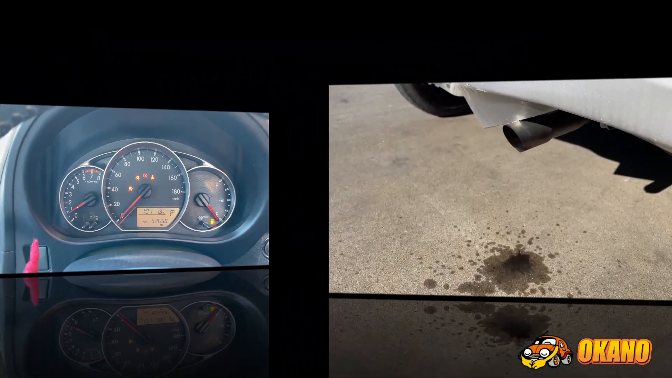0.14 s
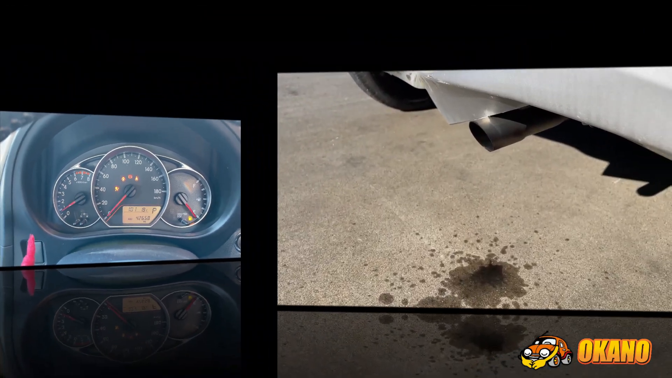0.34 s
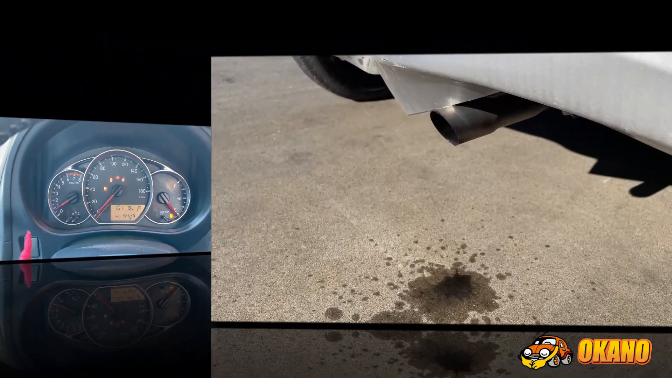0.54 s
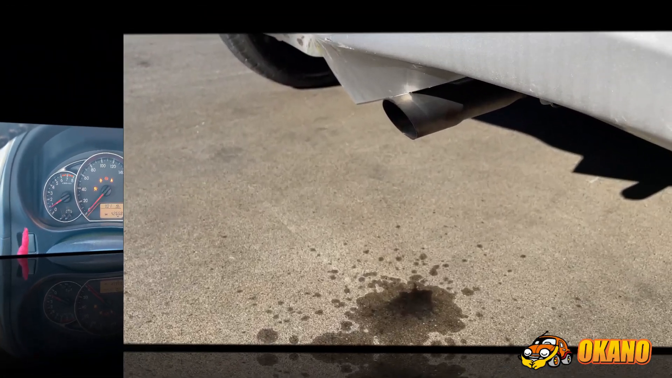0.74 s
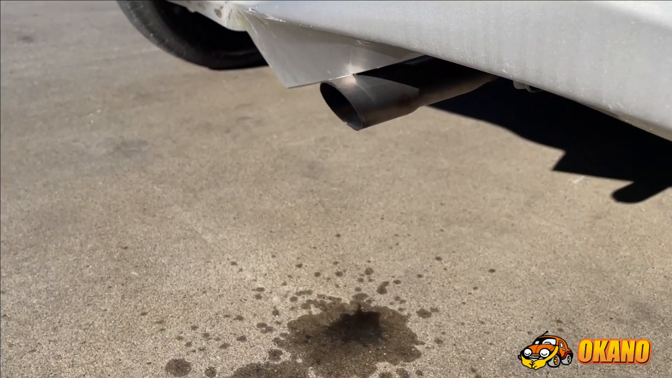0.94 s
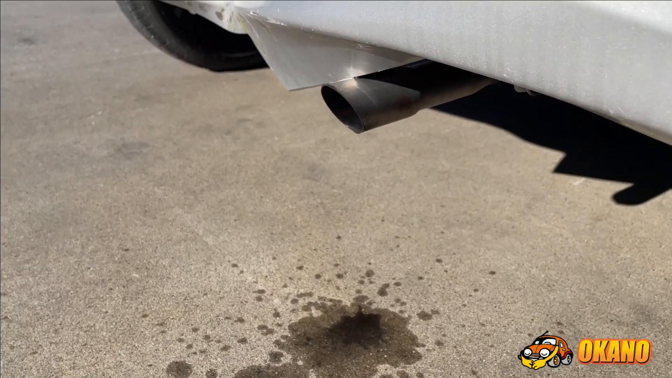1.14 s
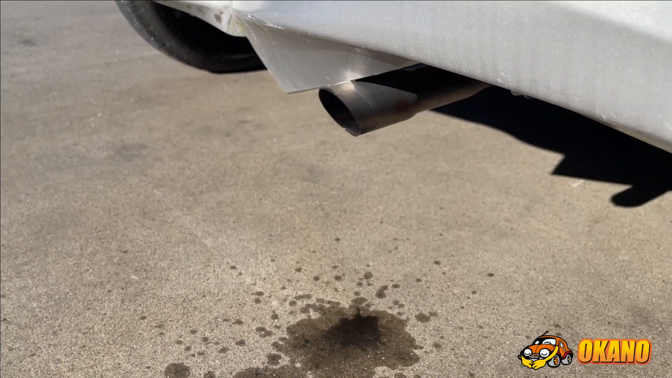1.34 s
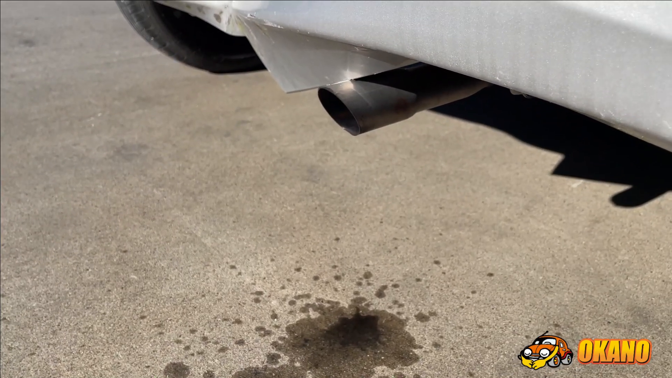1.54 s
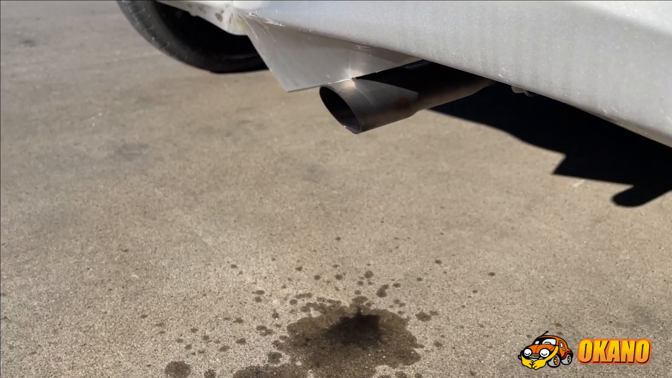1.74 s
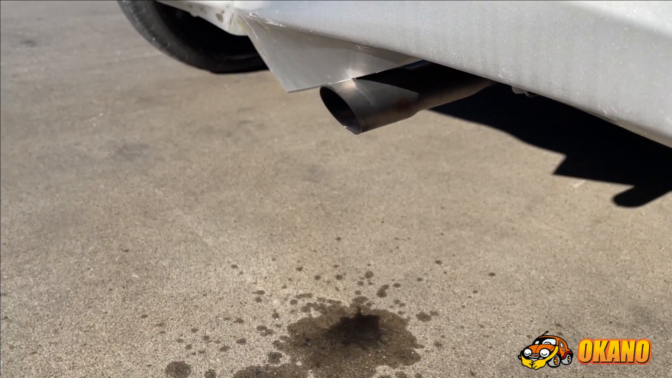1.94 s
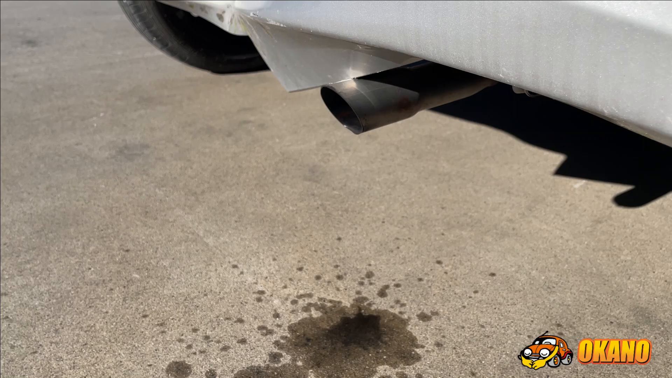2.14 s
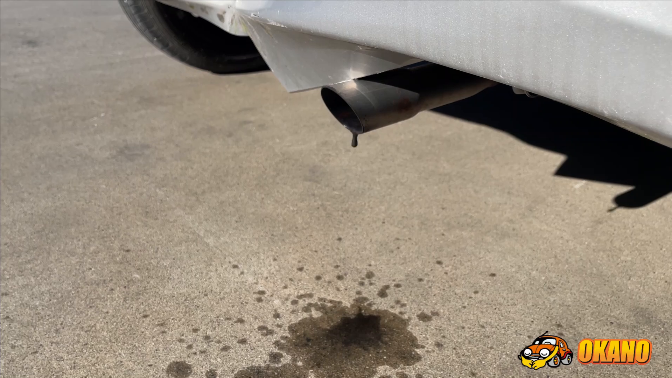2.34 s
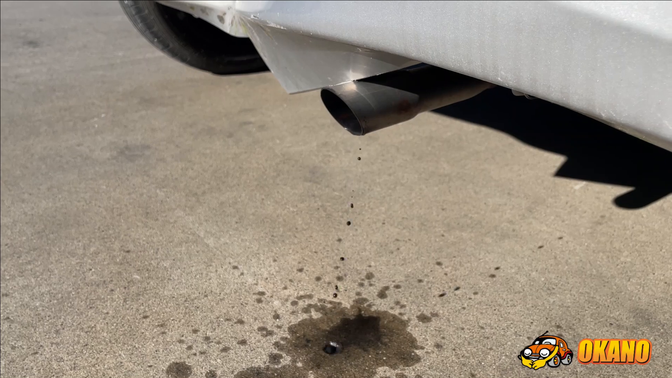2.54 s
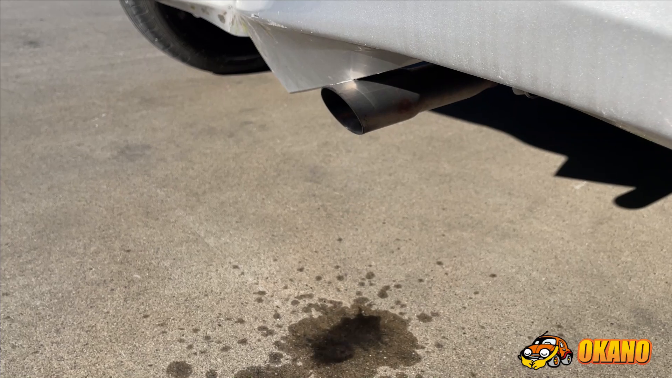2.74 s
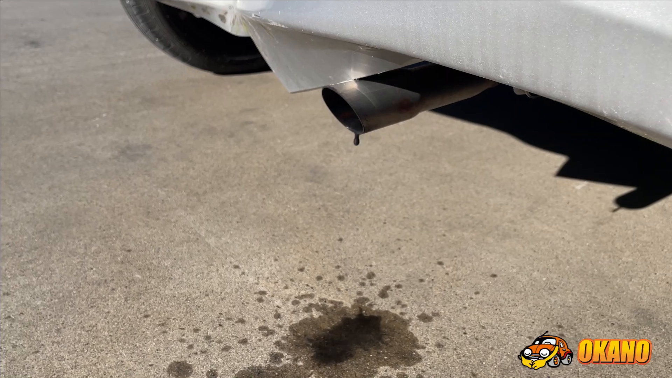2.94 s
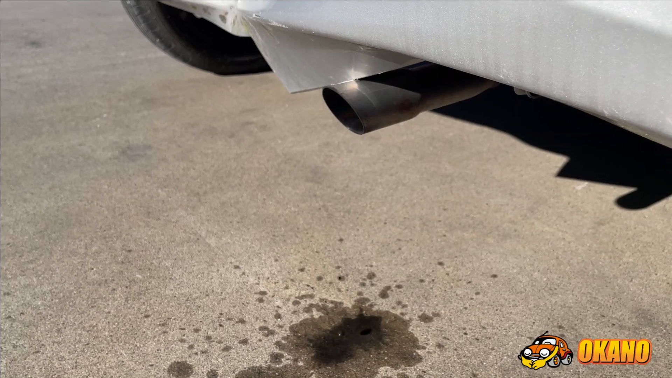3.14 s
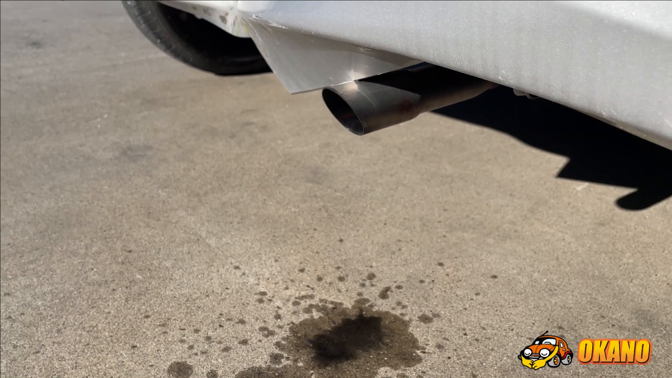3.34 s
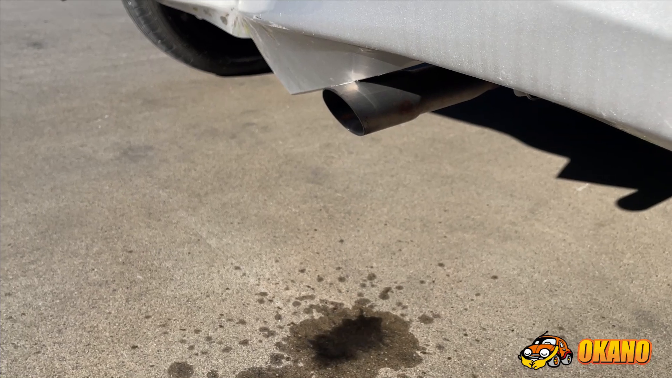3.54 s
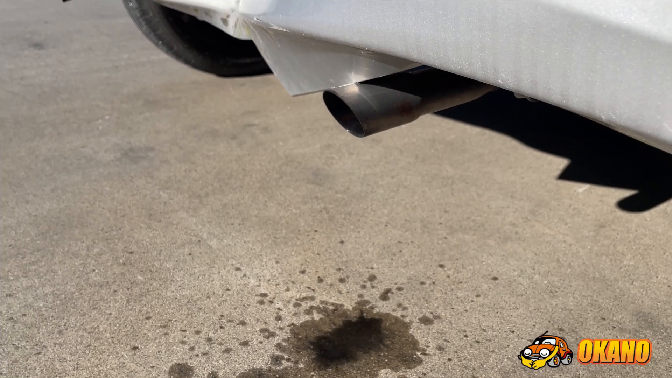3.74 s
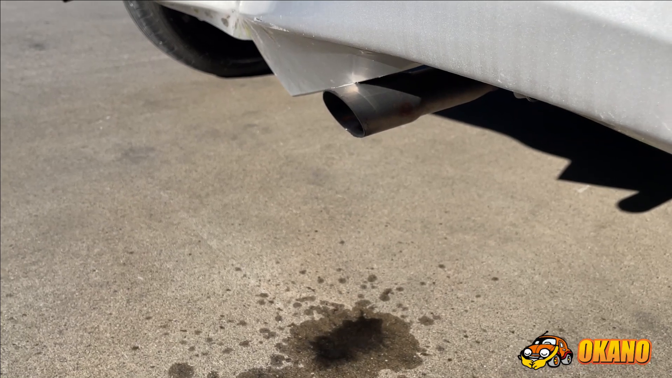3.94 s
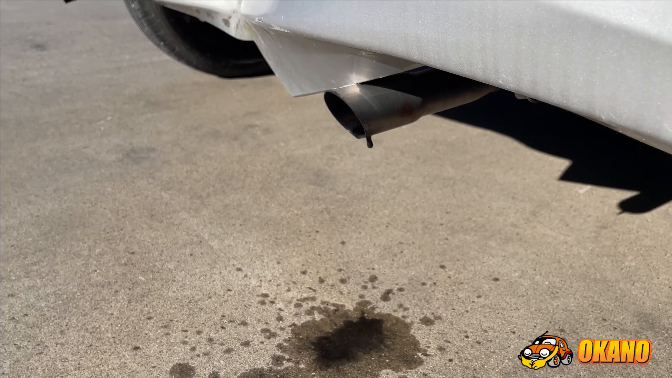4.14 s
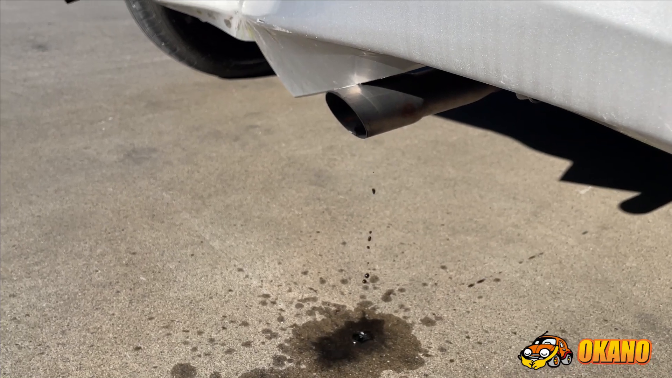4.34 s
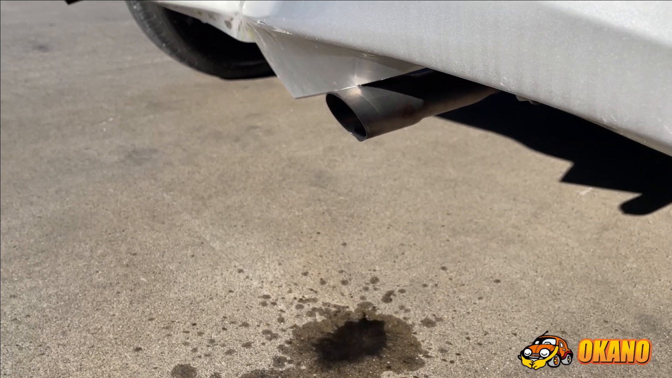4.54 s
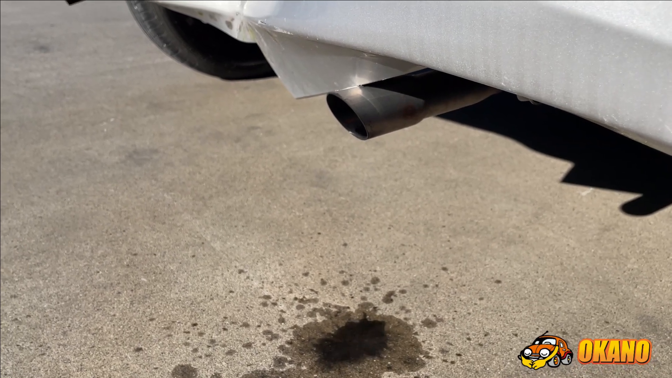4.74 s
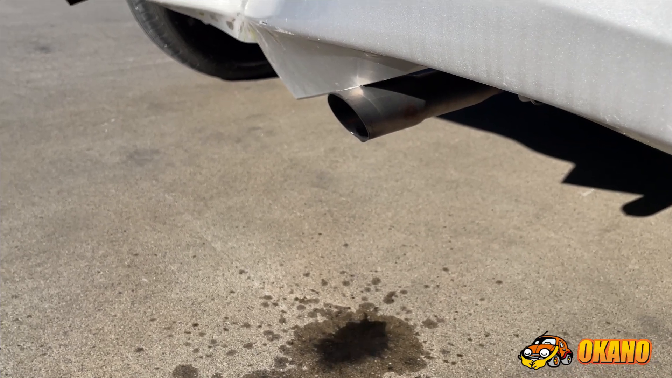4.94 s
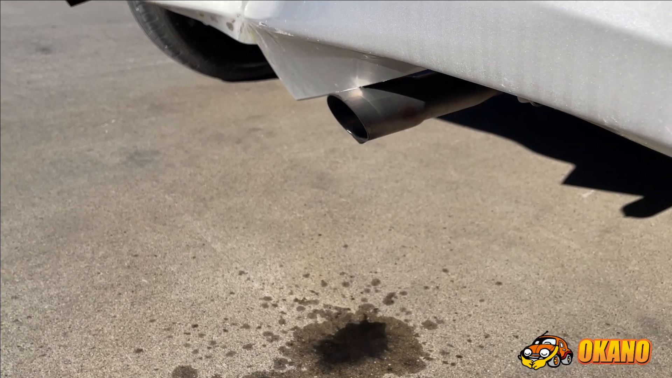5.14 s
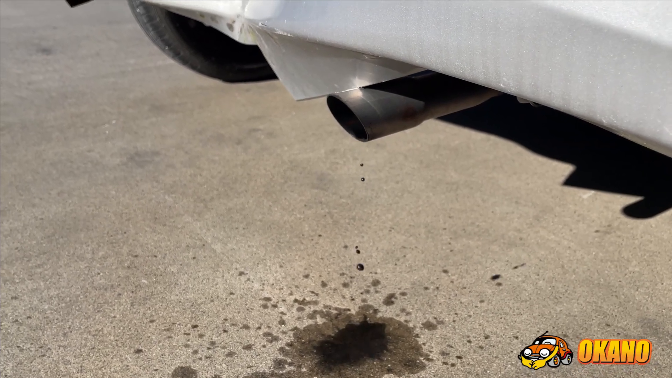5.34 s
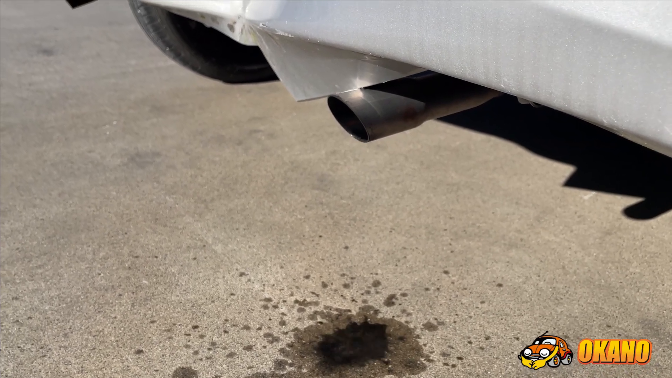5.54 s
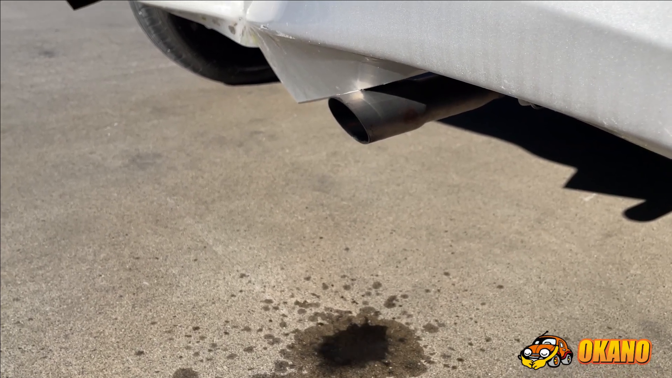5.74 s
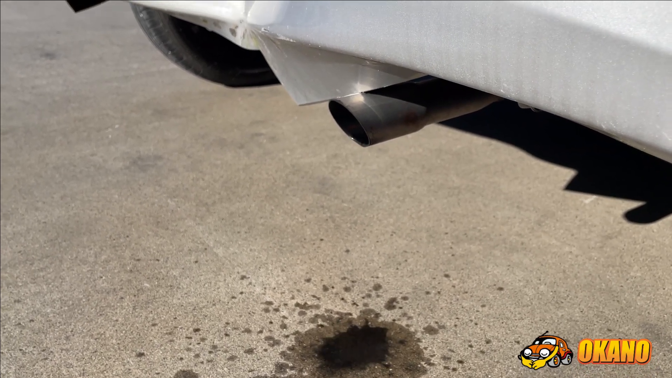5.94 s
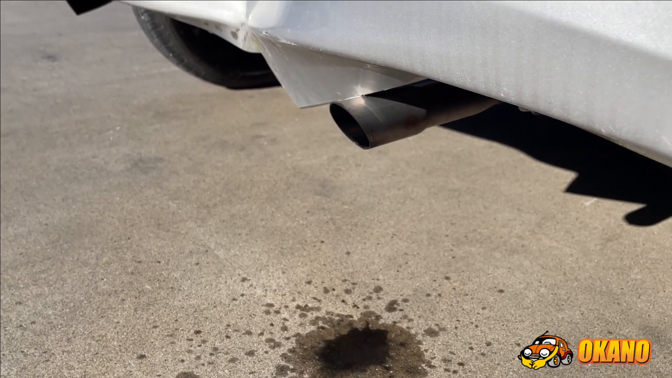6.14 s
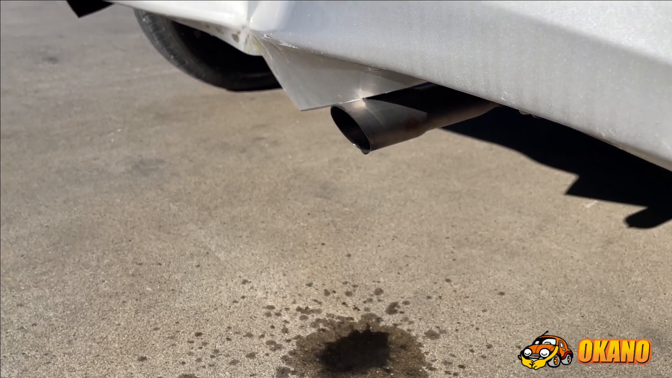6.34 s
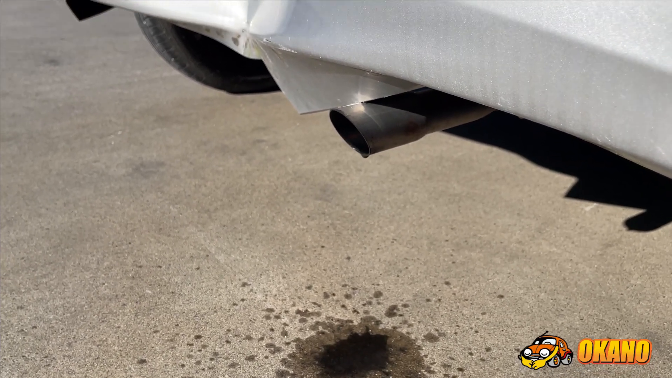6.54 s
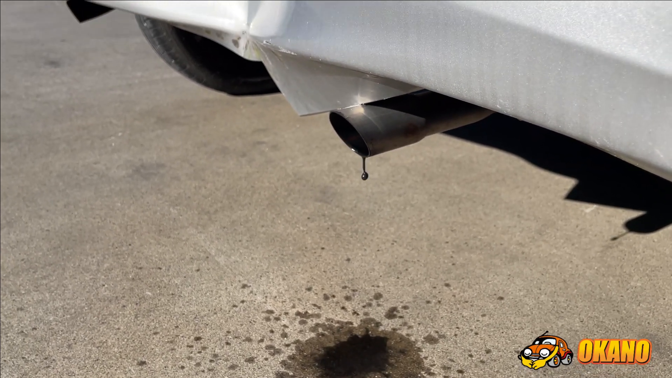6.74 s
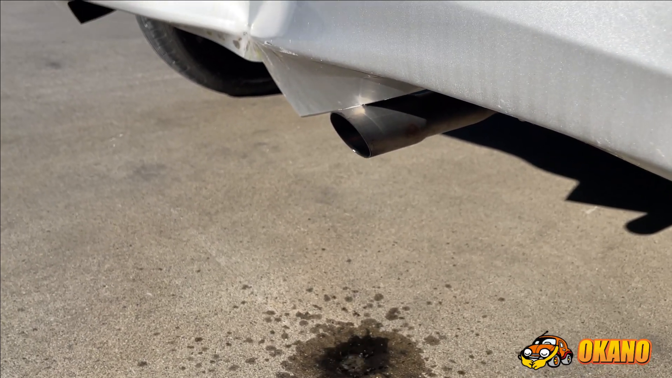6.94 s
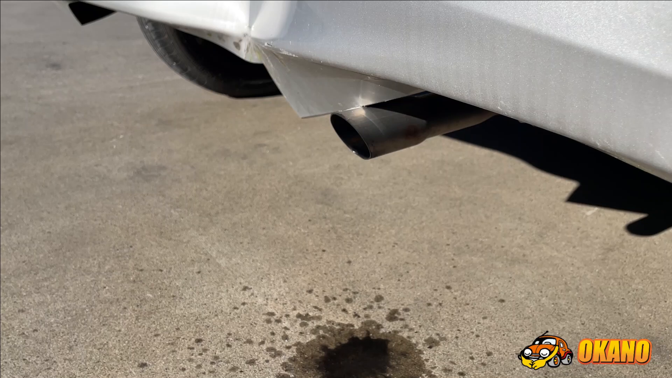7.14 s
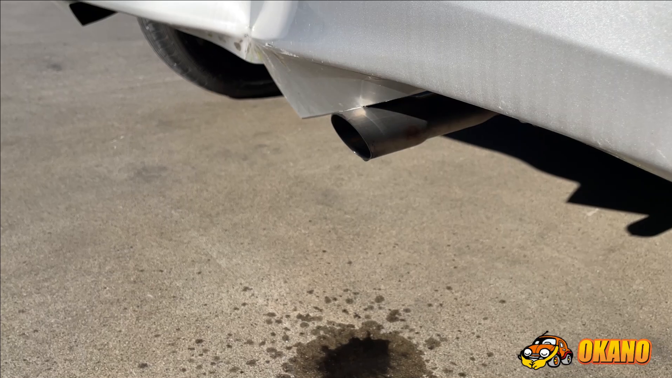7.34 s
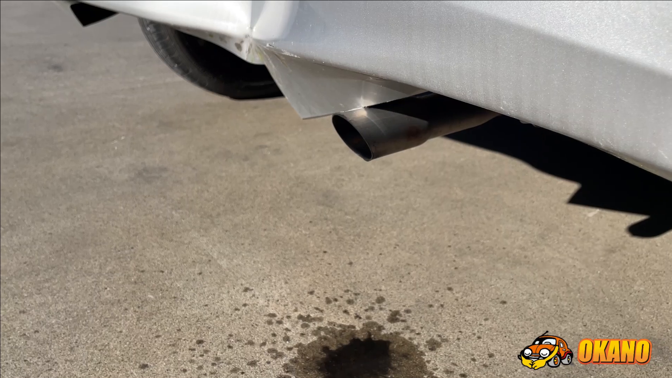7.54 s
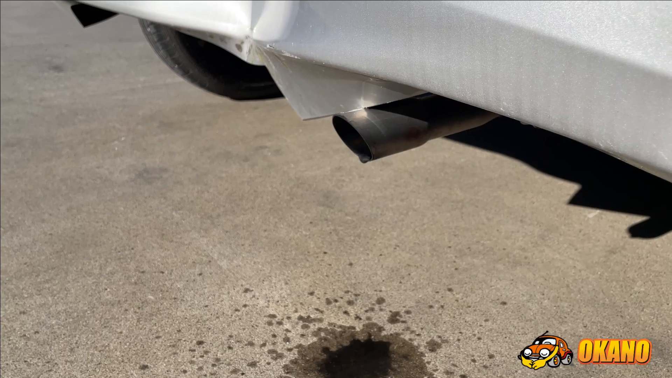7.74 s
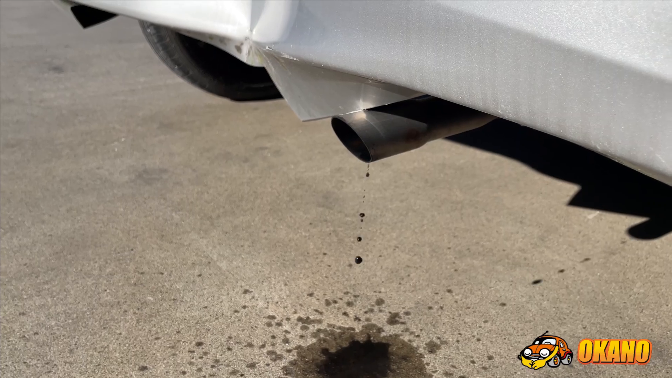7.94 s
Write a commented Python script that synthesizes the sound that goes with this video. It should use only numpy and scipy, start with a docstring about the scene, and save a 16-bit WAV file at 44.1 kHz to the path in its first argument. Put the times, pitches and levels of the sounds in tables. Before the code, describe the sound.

Heard very close to a car tailpipe outdoors: soft, slightly uneven idle puttering, then one long, smooth rev. Separate beats merge into a buzzing growl, then a sustained high drone with wavering metallic whines, gas roar and bright hiss. Low lumpy gusts bump the microphone midway. At the end the throttle closes, the firing falters and the pitch slides down, still well above idle.

```python
"""Small engine revved beside its tailpipe

A four-cylinder petrol engine idles, is revved slowly to high speed and released, in a paved yard.
Boom and whine are tones locked to the firing rate; clicks at each firing ring the exhaust and its shell.
Gas roar and hiss are noise puffed by the firings; gusts are low, lumpy noise.
Two close microphone ports hear the engine with slightly different timing and level.
"""
import sys
import numpy as np
from scipy import signal
from scipy.fft import rfft, irfft, next_fast_len
from scipy.io import wavfile

SR = 44100
rng = np.random.default_rng(int(sys.argv[2]) if len(sys.argv) > 2 else 0)


def dump_mix(stems):
    """Bounce the given channels to the path in sys.argv[1] as a 16-bit WAV at rate SR."""
    frames = np.atleast_2d(stems).T  # one column per channel
    limited = np.clip(frames, -1, 1)  # hard clip at full scale
    pcm = np.round(limited * 32767).astype(np.int16)
    wavfile.write(sys.argv[1], SR, pcm)


N = 356769
PADDED = next_fast_len(N)  # samples, a handy length for the Fourier transform

# engine speed, from idle through the slow rise to the release: (time [s], firing rate [1/s])
SPEED_CURVE = [(0.06, 24.25), (.6, 24.2), (1.1, 24.6), (1.5, 24.4), (1.72, 24.37), (1.94, 27.8),
               (2.12, 35.3), (2.26, 42.2), (2.5, 55.7), (2.74, 69.9), (3.03, 85.2), (3.53, 102.9),
               (3.83, 115.4), (4.25, 136.0), (4.57, 146.0), (4.79, 151.5), (5.09, 158.6), (5.25, 162.3),
               (5.69, 169.8), (6.27, 175.4), (6.79, 179.8), (7.2, 182.1), (7.41, 182.9), (7.55, 183.4),
               (7.61, 181), (7.71, 169.8), (7.83, 159.6), (7.93, 150.5), (8.09, 135.4)]
# strength of each sound over time: (time [s], hiss [dB], pulses [dB], boom [dB],
#   half orders against the boom [dB], rasp [dB])
GAS_FLOW = [(0.06, -61.5, -25, -12, -20, -61), (1.0, -57, -20.5, -5, -20, -52),
            (1.83, -57, -21, -8.5, -18, -58), (1.93, -55, -17, -3.5, -20, -52),
            (2.23, -50.5, -14.5, -5.5, -18, -48), (2.5, -44, -8, -3, -23, -40.5),
            (2.83, -38.5, -7.5, -5.5, -16, -34), (3.19, -36.5, -12, -5.5, -18, -32.5),
            (3.64, -35, -17.5, -7, 2, -31), (3.99, -32.5, -12.5, -0.5, -38, -29),
            (4.29, -32, -15.5, 2.5, -23, -30.5), (4.46, -34, -25.5, -1, -53, -33),
            (5.1, -33.5, -25.5, -3, -19, -35), (5.7, -32.5, -33, -3, 4, -34.5),
            (6.68, -32.5, -29, -4.5, 4.5, -42), (7.5, -32.5, -34.5, 0, -4, -32.5),
            (7.62, -31.5, -22.5, 0.5, 1, -31.5), (7.78, -32, -19.5, -5, -1, -27.5),
            (7.95, -34.5, -17.5, -2, -36, -28.5), (8.09, -37.5, -31, -6.5, -2, -31)]
# unequal manifold runs, one entry per cylinder: (lateness of its pulse [ms])
CYLINDER_LATENESS = [0, .24, -.015, .26]
# low engine orders: (multiple of the firing rate, level at 100 firings per s [dB],
#   gain per doubling of speed [dB])
LOW_ORDERS = [(1, -7, 0), (.5, -12.5, -0.9), (1.5, -31.5, -3.5), (2, -20, -2.5), (3, -18, 3), (4, -21, 2.5)]
# how the exhaust passes a low tone: (frequency [Hz], level [dB])
BOOM_PASSED = [(24, -49), (48, -5), (76, -8), (87, 0), (100, -5.5), (112, -13.5), (124, -14.5), (138, -8),
               (160, 0), (190, -7), (238, 12.5), (285, -3), (310, 2), (350, -3), (400, -7), (450, -3.5),
               (500, -15.5), (550, -18.5), (700, -14), (732, -26)]
# flutter of the lowest tone on the way up: (time [s], level change [dB])
BOOM_FLUTTER = [(3.2, 1), (3.26, -10), (3.336, 6.5), (3.4, -3), (3.445, 5), (3.51, -16), (3.55, 7),
                (3.62, 1), (3.7, 9.5), (3.76, 7), (3.82, 10), (3.87, -2)]
# thin whines locked to engine speed: (multiple of the firing rate)
WHINE_MULTIPLES = [2.5, 3.5, 4.5, 5, 5.5, 6, 6.5, 7, 8, 9, 9.5, 10, 10.5, 11, 11.5, 12, 12.5, 13, 13.5, 14,
                   14.5, 15, 15.5, 16, 16.5, 17.5, 18, 18.5, 19, 19.5, 21, 21.5, 22, 23]
# strength of each whine at 170 firings per s, before the resonances: (level [dB])
WHINE_LEVELS = [-22.5, -24.5, -28, -30.5, -31.5, -41, -30, -36, -33.5, -24.5, -54, -33, -48, -25, -41.5,
                -24.5, -29, -33.5, -67, -51, -37, -31.5, -41.5, -38, -41, -36, -48, -39, -42, -38, -33.5,
                -33, -35, -34]
# resonances that swell a whine as it crosses them: (centre [Hz], width at half height [Hz], level [dB])
WHINE_RESONANCES = [(437, 103, -2.3), (615, 103, -2.5), (858, 36, 2.5), (910.6, 55, 2), (1027, 18, 7.5),
                    (1057, 50, 6), (1240, 130, 0), (1416, 57, 1), (1550, 320, -7.5), (1650, 31, -3.5),
                    (1808, 80, -15), (1998, 156, -7), (2120, 33, -7), (2233, 93, -8.5), (2630, 290, -5.5),
                    (2600, 54, 2), (2870, 87, 0), (3306, 260, -1), (3830, 150, -9.5), (4200, 21, -4.5)]
# exhaust resonances: (centre [Hz], width of one pass [Hz], level for pulses [dB], level for roar [dB])
EXHAUST_MODES = [(85, 11, 32.5, -40), (144, 148, 0, -7), (232.5, 37.3, 20, -4.5), (305.5, 140, -1, -2),
                 (441, 113, 0, -13), (576, 178, -13, -5), (810, 120, -2.5, -3), (1016.6, 71, 7, -4.5),
                 (1152, 147, -4.5, -10), (1510, 810, -32, -16), (1978, 360, -12.5, -25.5),
                 (2280, 170, -45, -62), (3235, 270, -19, -28)]
# relative colour of the jet noise: (frequency [Hz], level [dB per Hz])
HISS_COLOUR = [(700, -85), (1300, -5), (1480, -3.5), (1600, -4.5), (2500, -3), (2790, -6.5), (3100, -3),
               (3400, -5), (3650, -9), (4200, -9), (6000, -14), (8000, -12.5), (11000, -21), (15700, -23.5)]
# swells of wind: (middle [s], length [s], peak level [dB])
GUST_SWELLS = [(1.096, 1, -37), (2.31, 0.33, -42), (2.78, 0.23, -36), (3.215, 0.58, -46),
               (3.67, 0.81, -23.5), (4.355, 0.48, -22.5), (8.053, 0.21, -27)]
# silencer chambers: (round trip [ms])
CHAMBER_TRIPS = [1.63, 3.634, 6.03]
# ringing of the thin tailpipe shell: (centre [Hz], width of one pass [Hz], level [dB])
SHELL_MODES = [(1060, 260, 6), (1410, 29, 9), (1646, 48, 8), (1831, 84, 7), (2082, 62, 11.5),
               (2260, 380, -2.5), (2414, 88, 8), (2593, 27, 10), (3020, 150, 1.5), (3207, 104, 5),
               (3367, 76, 3.5), (3900, 150, -13), (5080, 280, -14)]
# phase between the ports: (frequency [Hz], lead of left over right [rad])
PHASE_LEAD = [(0, 0), (600, -0.7), (1030, 0.0), (1460, -1.4), (1980, 0.4), (3700, 0.4), (5080, 0.6),
              (6720, -1.1), (7670, -2.9), (8870, -3.4), (10400, -6.0), (12300, -6.3), (13900, -9.1),
              (15300, -9.5)]
# level between the ports: (frequency [Hz], left minus right [dB])
LEVEL_BALANCE = [(100, -.5), (250, 0), (600, -2.5), (1100, 0), (2000, 1.8), (4500, 1.5), (7000, 0)]

# Unevenness at idle: changes with speed inside firings().
IDLE_PER_S, SPREAD_DB, SPREAD_MS = 24.37, 1.0, .1
STEP, TOP_STEP = .07, .5  # strong-weak step between cylinders at idle, and its upper limit, 0-1
FIRING_AT_S = .0743  # the firing count is zero here
STUMBLE_S, STUMBLE_LENGTH_S, STUMBLE_TIMES = 7.74, .24, 3.2  # firing falters as the throttle shuts
SHUT_S, SHUT_FADE_S = 7.55, .06
SHUT_ROAR_DB, SHUT_THIRD_ORDER_DB = 2.5, 4.0  # roar and third order grow with the throttle shut
SHUT_WHINE_DB, SHUT_HIGH_WHINE_DB = -6.0, -11.0  # all whines; further change above the eighth multiple
# added near the seventh multiple, a little after the throttle shuts
SEVENTH_HOWL_DB, HOWL_LATE_S = 12.0, .22

BOOM_EARLY_MS = 1.0  # the pressure swing leads the pulse
UPPER_FOLLOWS = 0.067  # share of the pulse swing taken by the boom from the second multiple up
WHINE_FOLLOWS = 0.53  # share of the pulse swing taken by whines up to the eighth multiple
WHINE_GAIN_DB = 1  # per doubling of speed, times the multiple
PULSE_CUT_HZ, CHAMBER_REFLECT = 600, .42
TICK_LATE_MS, TICK_ECHO_MS = 16.5, 12.0  # upper resonances are struck late, then by an echo down the pipe
TICK_DB, TICK_ECHO_DB, TICK_ECHO_CUT_HZ = -1.5, 2.0, 940  # echo level is at idle, against the tick
TICK_STEP = 0.23  # strong-weak step of the tick at idle, 0-1
GAS_LATE_MS, ROAR_EXTRA_MS = 11.2, 4  # gas and rasp come after the pulse; the roar later still
ROAR_DB, ROAR_LOSS_DB = 20, 8.5  # roar over the hiss; lost for each 100 firings per s
SHELL_AWAKE_PER_S = 70  # below this firing rate the lower shell modes are struck less
SCATTERED_SHARE = 0.58  # gas noise by way of ground and bodywork, unlike at the two ports
BREEZE_DB = -41
START_S, START_FADE_S, CUTOFF_HZ = 0.051, 0.0012, 15730


def from_db(db):
    """Turn decibels into gain."""
    return 10 ** (np.asarray(db) / 20)


def rms_one(x):
    """Scale a sound to an average (rms) strength of one."""
    return x / np.sqrt(np.mean(x ** 2) + 1e-20)


def samples(ms):
    """Turn milliseconds into whole samples."""
    return int(ms * SR / 1000)


def in_time(rows):
    """Draw each table column as a curve with one value per sample."""
    s, *columns = np.transpose(rows)
    return [np.interp(np.arange(N) / SR, s, column) for column in columns]


def drift(rate):
    """Wander slowly by chance with spread 1, about rate times a second."""
    knots = rng.standard_normal(int(N / SR * 60) + 2)
    memory = np.exp(-2 * np.pi * rate / 120)
    slow = signal.lfilter([1], [1, -memory], np.repeat(knots, 2))
    return np.interp(np.arange(N) / SR * 120, np.arange(len(slow)), rms_one(slow))


def band(x, low_hz, high_hz):
    """Keep the sound between two frequencies."""
    return signal.sosfilt(signal.butter(2, [low_hz, high_hz], "band", fs=SR, output="sos"), x)


def pipe(x, modes, levels_db, waver_db=0):
    """Ring side-by-side resonances of alternating sign; each acts twice, so it swells softly."""
    out = 0
    for k, ((hz, width, *_), db) in enumerate(zip(modes, levels_db)):
        r = np.exp(-np.pi * width / SR)
        b = np.array([1, 0, -1]) * (1 - r * r) / 2
        a = [1, -2 * r * np.cos(2 * np.pi * hz / SR), r * r]
        ringing = signal.sosfilt([[*b, *a]] * 2, x)
        out = out + (-1) ** k * from_db(db + waver_db * drift(1)) * ringing
    return out


def throttle_shut(late_s=0):
    """Stay at 0 while the throttle is open and rise to 1 once it shuts."""
    return np.clip((np.arange(N) / SR - SHUT_S - late_s) / SHUT_FADE_S, 0, 1)


def firings(turns, per_s):
    """Click once per firing; chance shrinks and the step between cylinders grows with speed."""
    number = np.arange(np.ceil(turns[0]), turns[-1] - 1)
    at = np.interp(number, turns, np.arange(N))
    late_ms = np.take(CYLINDER_LATENESS, number.astype(int) % 4)
    fast = per_s[at.astype(int)] / IDLE_PER_S
    stumble = 1 + STUMBLE_TIMES * np.exp(-((at / SR - STUMBLE_S) / STUMBLE_LENGTH_S) ** 2)
    chance = rng.standard_normal((len(at), 2)) * stumble[:, None]
    late_ms = late_ms + chance[:, 0] * stumble * SPREAD_MS / fast
    at = np.clip(at + late_ms * SR / 1000, 0, N - 2)
    # pairs differ, one cylinder leads
    cylinder = np.cos(np.pi * number) + .3 * np.cos(np.pi * number / 2)
    strength = from_db(SPREAD_DB / fast ** .25 * chance[:, 1])
    strength = strength * (1 + np.minimum(STEP * fast ** 1.1, TOP_STEP) * cylinder)
    # share each click between two samples, to place it in between
    clicks = np.zeros(N)
    np.add.at(clicks, at.astype(int), strength * (1 - at % 1))
    np.add.at(clicks, at.astype(int) + 1, strength * (at % 1))
    return clicks


def boom(turns, per_s, half_db, swing_db):
    """Sound the lowest orders as tones: pressure builds slowly, drops fast and swells low resonances."""
    out = 0
    hz, passed_db = np.transpose(BOOM_PASSED)
    flutter_db, = in_time(BOOM_FLUTTER)
    for k, db, gain_db in LOW_ORDERS:
        k = np.round(2 * k) / 2
        level_db = db + gain_db * np.log2(per_s / 100)
        level_db = level_db + np.interp(np.log(k * per_s), np.log(hz), passed_db)
        level_db = level_db + half_db * (k % 1 > 0) + UPPER_FOLLOWS * swing_db * (k >= 2)
        level_db = level_db + flutter_db * np.isclose(k, 1)
        level_db = level_db + SHUT_THIRD_ORDER_DB * throttle_shut() * np.isclose(k, 3)
        tone = np.sin(2 * np.pi * k * turns - np.pi / 4 * (k < 1))
        out = out - np.sqrt(2) * from_db(level_db) * tone
    return out


def whine(turns, per_s, swing_db):
    """Sound thin wavering tones at multiples of the firing rate, swelling as they cross resonances."""
    out = 0
    hz, width, peak_db = np.transpose(WHINE_RESONANCES)
    scale_hz = np.arange(1, 4500)
    doublings = np.log2(per_s / 170)
    peaks = from_db(peak_db) / (1 + (2 * (scale_hz[:, None] - hz) / width) ** 2)
    response = np.max(peaks, axis=1)
    for k, db in zip(WHINE_MULTIPLES, WHINE_LEVELS):
        swell = np.interp(k * per_s, scale_hz, response) * from_db(db + WHINE_GAIN_DB * k * doublings)
        load_db = WHINE_FOLLOWS * swing_db if k <= 8 else SHUT_HIGH_WHINE_DB * throttle_shut()
        load_db = load_db + SHUT_WHINE_DB * throttle_shut()
        load_db = load_db + SEVENTH_HOWL_DB * throttle_shut(HOWL_LATE_S) * (6 < k < 7.5)
        tone = np.sin(2 * np.pi * k * turns + .3 * drift(4))
        out = out + swell * from_db(load_db + 2.6 * drift(2.5)) * tone
    return out


def puffs(clicks, per_s, decay_s, steady):
    """Give the gas speed: a jump at each firing that dies away, over a steady stream."""
    r = np.exp(-1 / (decay_s * SR))
    return steady + signal.lfilter([1], [1, -r], clicks) / (1 + per_s * decay_s)


def roar(gate):
    """Puff turbulent noise through the exhaust resonances: one direct and one scattered draw."""
    return rms_one(pipe(gate * rng.standard_normal((2, N)), EXHAUST_MODES, np.array(EXHAUST_MODES)[:, 3]))


def hiss(gate):
    """Puff and colour the bright jet noise at the pipe mouth, direct and scattered."""
    hz, db = np.transpose(HISS_COLOUR)
    grid_hz = np.fft.rfftfreq(PADDED, 1 / SR)
    colour = from_db(np.interp(np.log(grid_hz + 1), np.log(hz), db))
    jet = irfft(rfft(gate * rng.standard_normal((2, N)), PADDED) * colour, PADDED)[:, :N]
    return jet / np.std(band(jet, 3500, 14000))


def gusts():
    """Rumble with lumpy low noise of air on the ports, mostly shared; gusts swell over a breeze."""
    shared, own = band(band(rng.standard_normal((2, N)), 40, 121.0), 38.0, 190)
    t = np.arange(N) / SR
    swells = sum(from_db(db) * np.cos(np.pi * np.clip((t - middle) / length, -.5, .5))
                 for middle, length, db in GUST_SWELLS)
    lumps = (from_db(BREEZE_DB) + swells) * from_db(2.5 * drift(27))
    return lumps * rms_one(shared + 0.59 * own * np.array([[1], [-1]]))


def silencer(x, reflect):
    """Throw the pulse to and fro in each chamber: all-pass delays smear it without colour."""
    spectrum = rfft(x, PADDED)
    for ms in CHAMBER_TRIPS:
        a = np.zeros(samples(ms) + 1)
        a[[0, -1]] = 1, -reflect
        spectrum = spectrum * rfft(a[::-1], PADDED) / rfft(a, PADDED)
    return irfft(spectrum, PADDED)[:N]


def pulses(clicks, turns, per_s):
    """Ring the exhaust with firing clicks: smeared in low modes, crisp in high ones, sharper at speed."""
    # take out the first four multiples, leaving the fifth and up
    lowest = 1 + 2 * sum(np.cos(2 * np.pi * k * turns) for k in range(1, 5))
    upper = (clicks - lowest * per_s / SR) / np.sqrt(per_s)
    soft = signal.lfilter(*signal.butter(1, PULSE_CUT_HZ, fs=SR), upper)
    struck = soft + (per_s / 60) ** 1.5 * (upper - soft)
    modes = np.array(EXHAUST_MODES)
    low, high = modes[modes[:, 0] < 500], modes[modes[:, 0] >= 500]
    alternating = 1 - TICK_STEP * IDLE_PER_S / per_s * np.cos(np.pi * turns)
    tick = np.roll(struck * alternating, samples(TICK_LATE_MS))
    dull = signal.butter(2, TICK_ECHO_CUT_HZ, fs=SR)
    echo = signal.lfilter(*dull, np.roll(tick, samples(TICK_ECHO_MS)))
    tick = from_db(TICK_DB) * (tick + from_db(TICK_ECHO_DB) * IDLE_PER_S / per_s * echo)
    low_ring = pipe(silencer(struck, CHAMBER_REFLECT), low, low[:, 2])
    return rms_one(low_ring + pipe(tick, high, high[:, 2]))


def rasp(clicks, per_s):
    """Tick the thin shell at each firing: separate ticks at idle, a dense stack of tones at speed."""
    ticks = clicks / np.sqrt(per_s) + 1e-18
    modes = np.array(SHELL_MODES)
    low, high = modes[modes[:, 0] < 2800], modes[modes[:, 0] >= 2800]
    awake = np.minimum(per_s / SHELL_AWAKE_PER_S, 1)
    low_ring = pipe(ticks * awake, low, low[:, 2], waver_db=3.5)
    return rms_one(low_ring + pipe(ticks, high, high[:, 2], waver_db=4.5))


def ports(x):
    """Let each port hear the sound with its own phase and level, half the difference on each side."""
    hz = np.fft.rfftfreq(PADDED, 1 / SR)
    level = from_db(np.interp(hz, *np.transpose(LEVEL_BALANCE)) / 2)
    half = level * np.exp(.5j * np.interp(hz, *np.transpose(PHASE_LEAD)))
    return irfft(rfft(x, PADDED) * [half, 1 / half], PADDED)[:, :N]


def scene():
    """Send the engine through the ports, with scattered gas noise and gusts beside it."""
    per_s, = in_time(SPEED_CURVE)
    hiss_db, pulses_db, boom_db, half_db, rasp_db = in_time(GAS_FLOW)
    swing_db = pulses_db - pulses_db[N // 2:].mean()
    turns = np.cumsum(per_s) / SR  # running count of firings
    turns -= turns[int(FIRING_AT_S * SR)]
    clicks = firings(turns, per_s)
    late = np.roll(clicks, samples(GAS_LATE_MS))

    early_turns = turns + BOOM_EARLY_MS * per_s / 1000
    exhaust = from_db(boom_db) * boom(early_turns, per_s, half_db, swing_db)
    exhaust = exhaust + from_db(pulses_db) * pulses(clicks, turns, per_s)
    exhaust = exhaust + from_db(rasp_db) * rasp(late, per_s)

    roar_db = hiss_db + ROAR_DB - ROAR_LOSS_DB * per_s / 100 + SHUT_ROAR_DB * throttle_shut()
    roar_gate = puffs(np.roll(late, samples(ROAR_EXTRA_MS)), per_s, .02, steady=.7)
    direct, scattered = from_db(roar_db + 1.0 * drift(7)) * roar(roar_gate)
    jet, far_jet = from_db(hiss_db) * hiss(puffs(late, per_s, .01, steady=8.0))

    # scattered noise has opposite sign at the two ports
    side = SCATTERED_SHARE * band(1.3 * scattered + far_jet, 270, 6000) * np.array([[1], [-1]])
    engine = exhaust + direct + jet + whine(turns, per_s, swing_db)
    return ports(engine) + side + gusts()


def record(dry):
    """Start after a short silence, round the peaks and cut the top."""
    on = np.clip((np.arange(N) / SR - START_S) / START_FADE_S, 0, 1)
    rounded = on * 1.39 * np.tanh(dry / 1.307)
    return signal.sosfilt(signal.cheby2(24, 70, CUTOFF_HZ, fs=SR, output="sos"), rounded)


dry = scene()
out = record(dry)
dump_mix(out)
```